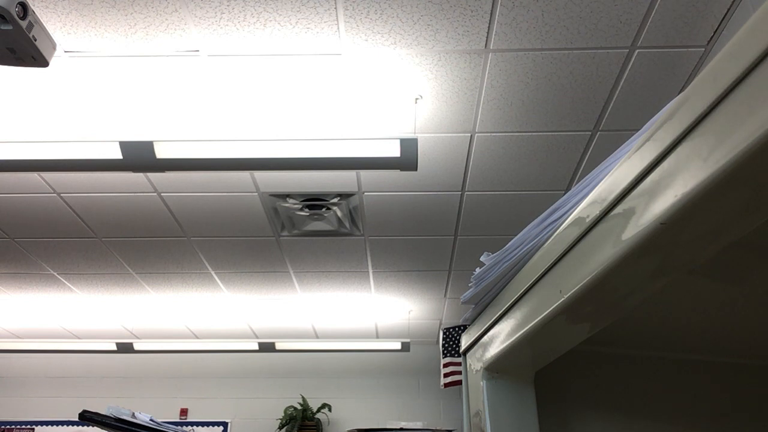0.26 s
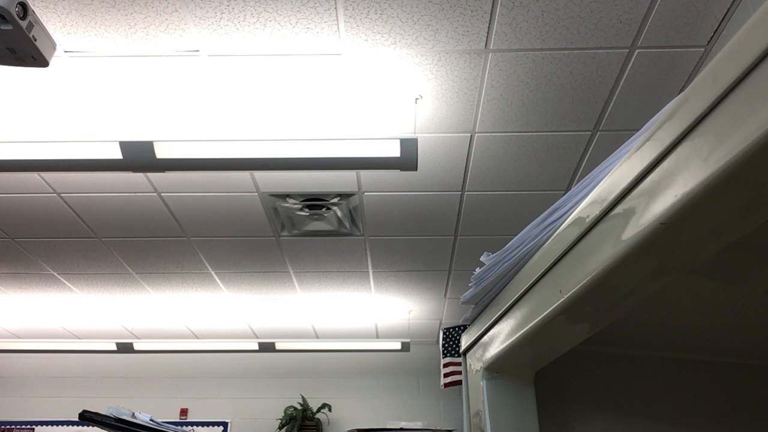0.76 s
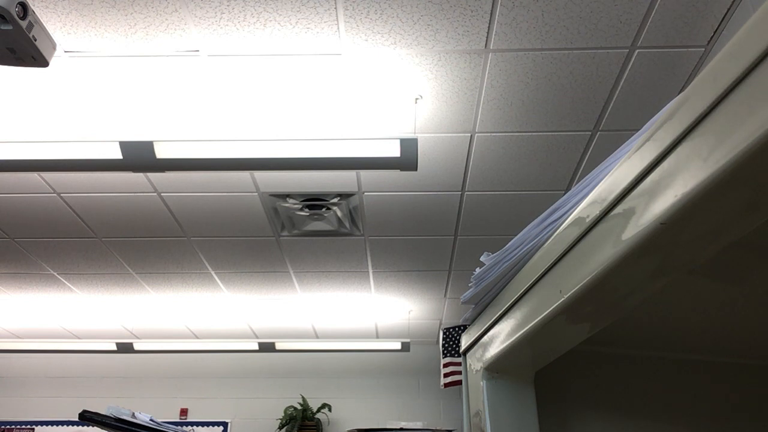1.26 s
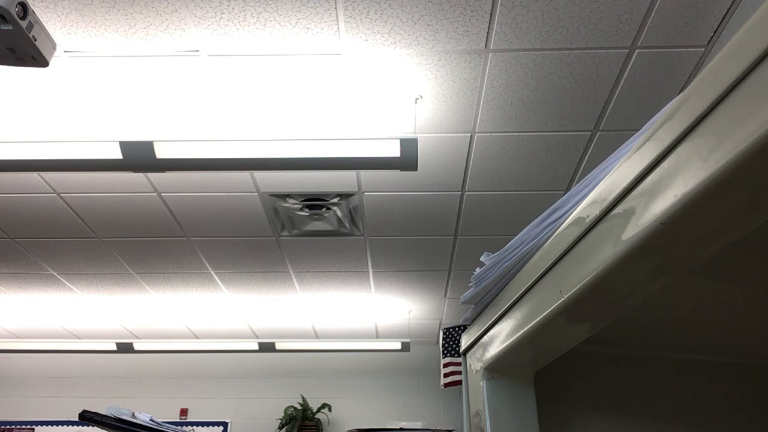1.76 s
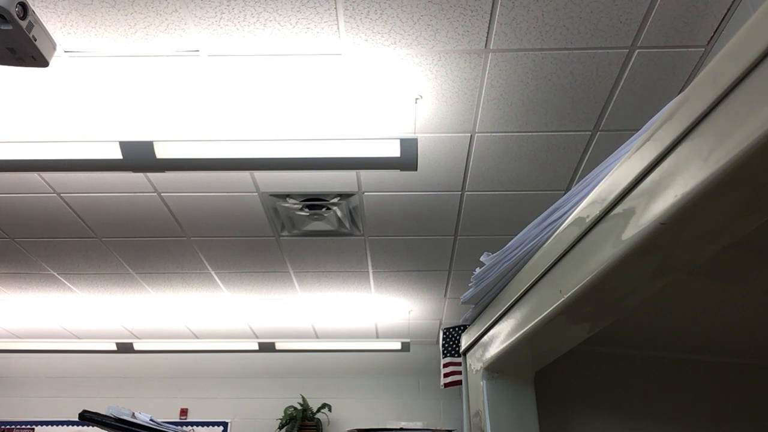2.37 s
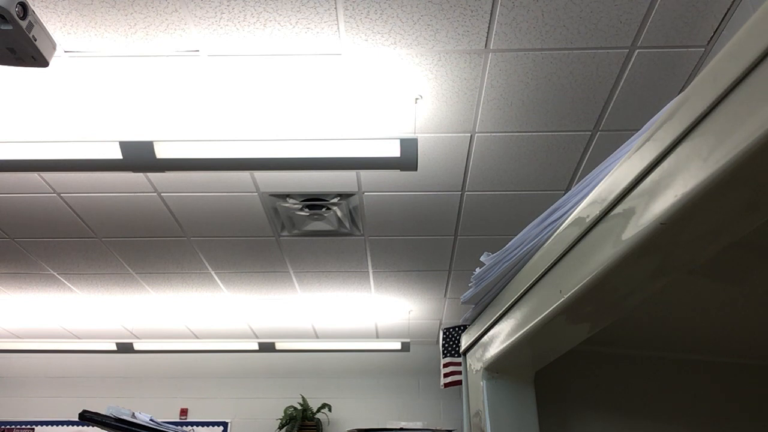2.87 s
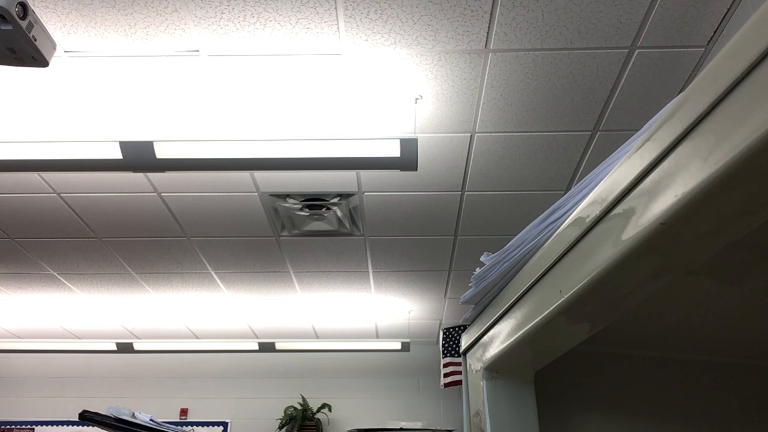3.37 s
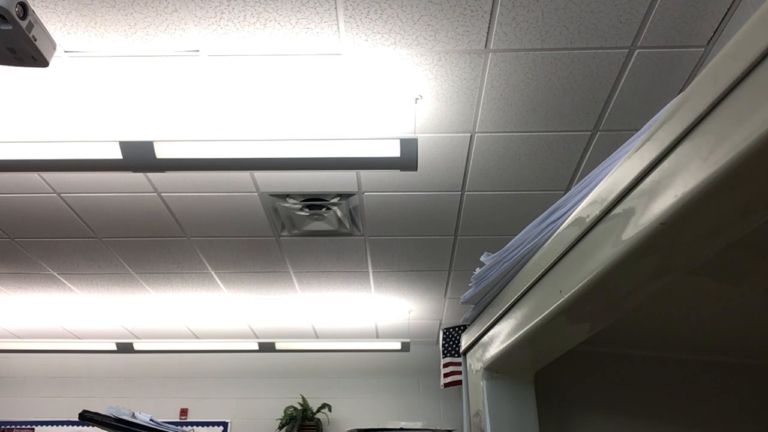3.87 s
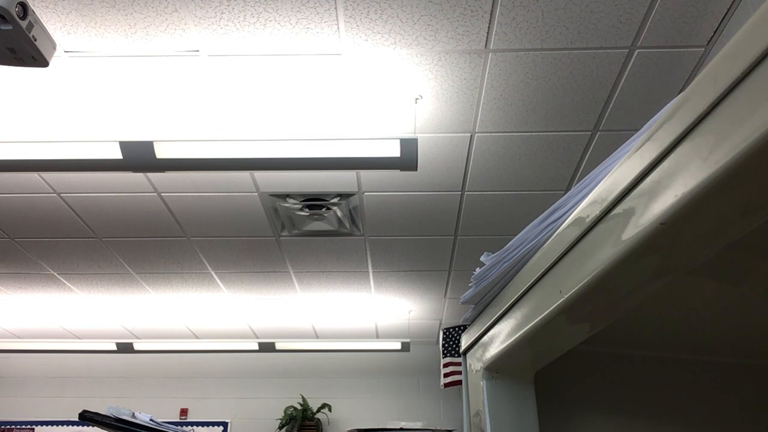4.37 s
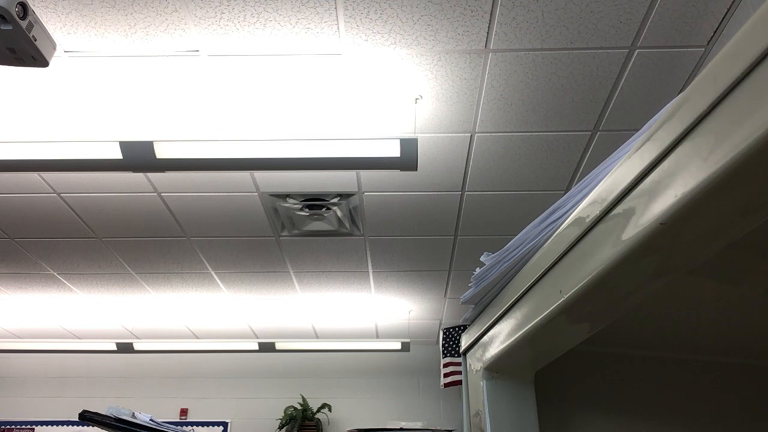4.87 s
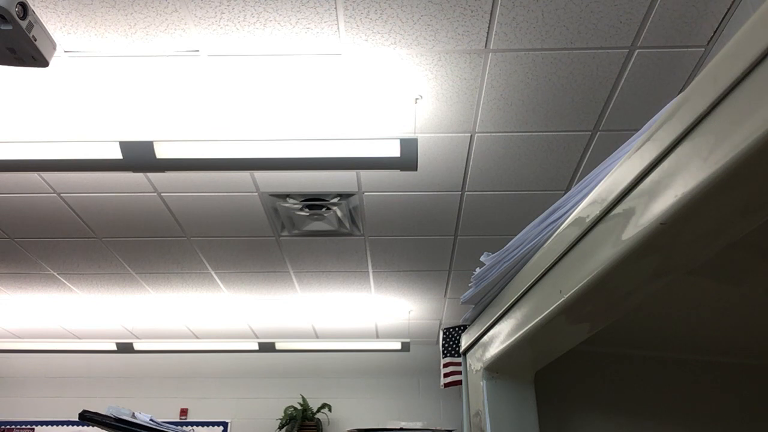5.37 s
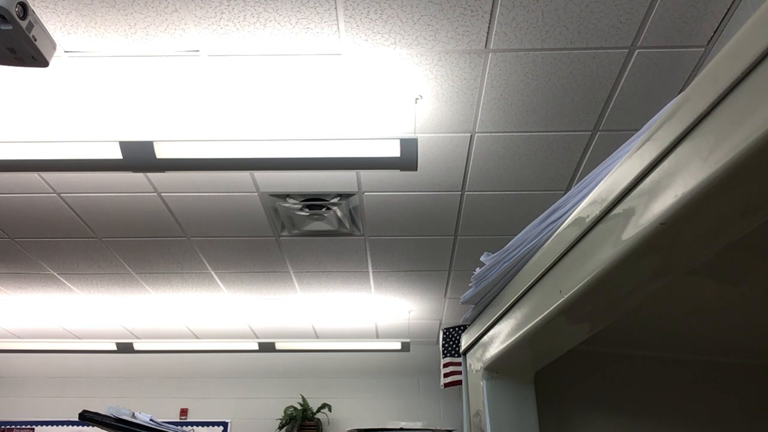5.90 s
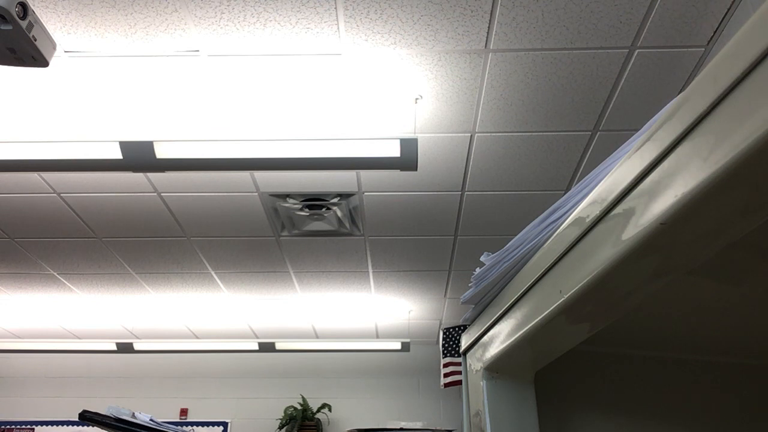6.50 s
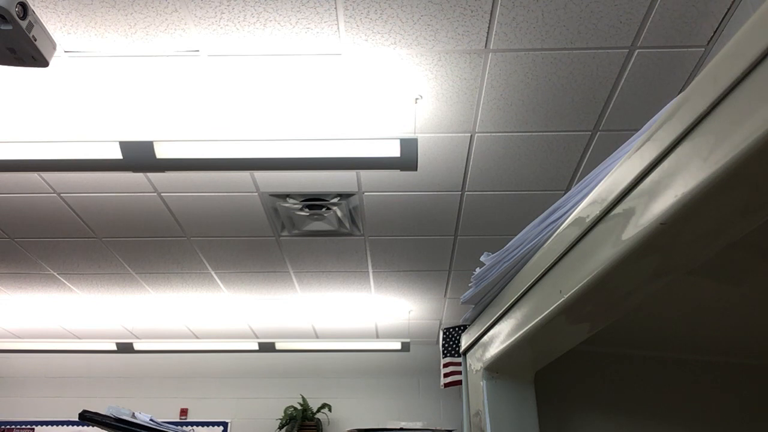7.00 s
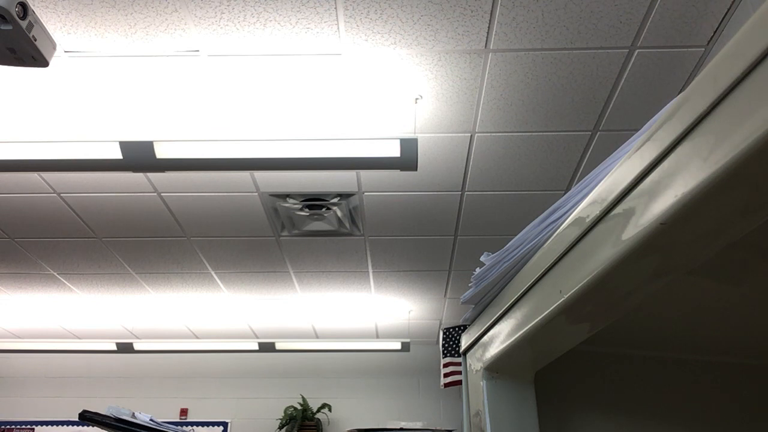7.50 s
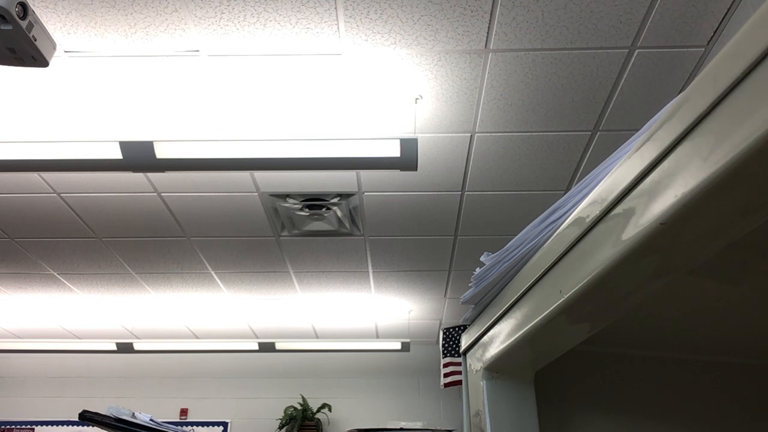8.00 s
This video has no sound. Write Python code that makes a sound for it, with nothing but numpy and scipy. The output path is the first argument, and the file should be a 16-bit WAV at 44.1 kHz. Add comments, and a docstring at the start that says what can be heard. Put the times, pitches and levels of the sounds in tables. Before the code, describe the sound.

Steady low fan and light hum in a still room while papers rustle, little objects are tapped down, something clicks close by, and sheets flick.

```python
"""A quiet classroom. From the start a belt-driven fan throbs under the mains hum of the lights, as steady
partials; noise rumbles in the duct and hisses at the vent. Paper slides in strokes of shaped noise,
small things are tapped and put down as ringing noise bursts, and dull scrapes swell on the floor.
At 1.4 s one sharp click of decaying modes snaps close by; after 5 s sheets are flicked in bright bursts.
The room answers the taps, the click and the flicks briefly with a tail of fading noise."""
import sys
import numpy as np
from scipy import signal
from scipy.fft import rfft, irfft, next_fast_len
from scipy.io import wavfile
from scipy.ndimage import map_coordinates

SR = 44100
rng = np.random.default_rng(int(sys.argv[2]) if len(sys.argv) > 2 else 0)


def transcribe(u):
    """Save the signal u as a 16-bit wav file named by the first command-line argument.

    u: samples, shape (n,) or (channels, n), limited to [-1, 1]; the rate is SR.
    q: integer samples, one column per channel.
    """
    v = np.clip(np.atleast_2d(u).T, -1, 1)
    q = np.round(v * 32767).astype(np.int16)
    wavfile.write(sys.argv[1], SR, q)


N = 363825  # samples: 8.25 s


def amp(db):
    """Decibels to gain."""
    return 10 ** (np.asarray(db) / 20)


def unit(x):
    """Scale to rms 1."""
    return x / np.sqrt(np.mean(x ** 2) + 1e-30)


def along(points, hz):
    """Read (f/Hz, value) points on a log frequency axis."""
    f, value = np.transpose(points)
    return np.interp(np.log(hz + 1), np.log(f + 1), value)


def wobble(rate):
    """A smooth random curve through rate knots a second."""
    knots = rng.standard_normal(int(N * rate / SR) + 4)
    return map_coordinates(knots, [np.arange(N) * rate / SR])


def filtered(x, response):
    """x shaped by a response given as a function of frequency."""
    size = next_fast_len(len(x) + 8192)
    hz = np.fft.rfftfreq(size, 1 / SR)
    return irfft(rfft(x, size) * response(hz), size)[:len(x)]


def noise(response):
    """Noise whose amplitude per root Hz is the response."""
    return filtered(rng.standard_normal(N) * np.sqrt(SR / 2), response)


def resonance(hz, centre, width):
    """Two like resonators in a row: a peak of gain 1 with steep skirts."""
    return (1j * hz * width / (centre ** 2 - hz ** 2 + 1j * hz * width)) ** 2


def add(track, s, sound):
    """Mix a sound in at time s."""
    part = track[max(round(s * SR), 0):][:len(sound)]
    part += sound[:len(part)]


def tones(lines, base_hz, clock):
    """Steady partials (multiple of base_hz, level/dB rms) running on a clock in seconds."""
    out = 0
    for multiple, db in lines:
        cycles = multiple * base_hz * clock + rng.random()
        out = out + amp(db) * np.sin(2 * np.pi * cycles)
    return np.sqrt(2) * out


BELT_HZ, MAINS_HZ = 6.675, 60  # turns of the belt a second; mains frequency
# the fan's throb: (multiple of the belt's turn rate, level/dB rms before it wavers)
BELT_PARTIALS = [(9, -75.5), (10, -66), (11, -55.5), (12, -54.5), (13, -64), (14, -56), (15, -64.5),
                 (16, -61), (17, -64), (19, -50.5), (20, -58.5), (21, -48), (22, -57.5), (23, -56),
                 (24, -69), (25, -55), (26, -73.5), (28, -70), (29, -65), (31, -68.5), (32, -80)]
# lights and motor windings: (multiple of the mains frequency, level/dB rms)
MAINS_PARTIALS = [(2, -42.5), (4, -65), (6, -72.5)]
# other shafts of the air plant: (f/Hz, level/dB rms)
SHAFT_TONES = [(58.3, -73.5), (86.3, -58), (100.9, -59.5), (148.1, -58), (154.7, -60.5)]


def hum():
    """Each turn of the belt shakes the duct alike, so its partials beat with the mains hum."""
    t = np.arange(N) / SR
    slip = 0.00036 * wobble(1.495)  # seconds: the belt runs a little unevenly
    lights = tones(MAINS_PARTIALS, MAINS_HZ, t)
    out = lights + tones(SHAFT_TONES, 1, t + slip)
    for partial in BELT_PARTIALS:
        eddies = amp(0.55 * wobble(2.91))  # eddies make each partial waver on its own
        out += eddies * tones([partial], BELT_HZ, t + slip)
    return out


# duct rumble: (f/Hz, level/dB per Hz)
DUCT_RUMBLE = [(20, -108), (36, -104), (48, -90), (72, -68), (95, -80), (112, -75.5), (150, -67),
               (185, -83.5), (212, -79.5), (260, -87.5), (370, -92.5), (520, -100), (900, -112),
               (2000, -135)]
# air leaving the vent: (f/Hz, level/dB per Hz)
VENT_HISS = [(200, -120), (650, -101), (1000, -108), (1800, -110.5), (3000, -111.5), (5000, -115),
             (7000, -115), (8200, -118), (11000, -120.5), (15500, -127)]
# duct resonances: (f/Hz, width of each resonator/Hz, peak level/dB per Hz)
DUCT_RESONANCES = [(451, 8.4, -89), (372, 14.5, -89.5)]


def air():
    """Turbulence rumbles and resonates in the duct and hisses at the vent."""
    rumble = noise(lambda hz: amp(along(DUCT_RUMBLE, hz)))
    hollow = noise(lambda hz: sum(amp(db) * resonance(hz, centre, width)
                                  for centre, width, db in DUCT_RESONANCES))
    hiss = noise(lambda hz: amp(along(VENT_HISS, hz)))
    return rumble + hollow + hiss


def nearby_surfaces(x):
    """Weak early copies from desk and shelves ripple the spectrum."""
    count, echo = 8, 0.17  # copies, gain of each relative to the direct sound
    delays = rng.uniform(0.002, 0.02, count)  # seconds

    def ripple(hz):
        return 1 + echo * sum(np.exp(-2j * np.pi * hz * d) for d in delays)
    return filtered(x, ripple) / np.sqrt(1 + count * echo ** 2)


# strokes of sliding paper: (start t/s, length t/s, rub level/dB, edge hiss level/dB)
PAPER_STROKES = [(0.21, 0.2, -74.5, -75), (0.4, 0.12, -72, -68.5), (1.21, 0.26, -77, -68),
                 (1.48, .62, -66, -68), (2.152, .11, -67, -68.5), (2.277, 0.29, -75, -78),
                 (2.873, .09, -83, -71), (3.042, 0.059, -85, -70.5), (3.797, 0.24, -67, -70.5),
                 (4.155, 0.22, -68.5, -74.5), (4.548, 0.39, -74, -72), (5.398, 0.32, -72, -70.5),
                 (5.744, 0.24, -77.5, -75), (5.97, .16, -70, -72.5), (6.407, 0.27, -74, -75.5),
                 (7.437, 0.3, -89, -73), (7.826, 0.26, -98, -72), (8.111, 0.15, -76, -66.5)]
# relative spectrum of the rubbing face of the sheet: (f/Hz, level/dB)
RUB_COLOUR = [(300, -5.5), (700, -4), (1300, 6.5), (2200, 4), (3000, 4), (4200, 2.5), (5200, -1),
              (7000, -26), (12000, -22)]
# relative spectrum of the hissing edge of the sheet: (f/Hz, level/dB)
EDGE_COLOUR = [(2500, -11), (4500, -1), (5800, -1.5), (7000, 3), (8000, -4.5), (10000, -8.5),
               (15500, -21.5)]
# where the paper rings thinly: (peak t/s, level/dB)
PAPER_RINGS = [(3.74, -70), (4.63, -76.5)]
STROKE_ATTACK_S, STROKE_RELEASE_S = 0.046, 0.051
DRIFT_RUB_DB, DRIFT_EDGE_DB = -80, -80.5  # the sheet never lies quite still
RING_HZ, RING_RISE_DB_PER_S, RING_FALL_DB_PER_S = 4080, 95, 25


def paper():
    """Paper slides in uneven strokes, catching and letting go; twice it rings thinly."""
    t = np.arange(N) / SR
    rub_power, edge_power = amp(DRIFT_RUB_DB) ** 2, amp(DRIFT_EDGE_DB) ** 2
    for s, length, rub_db, edge_db in PAPER_STROKES:
        attack = np.clip((t - s) / STROKE_ATTACK_S, 0, 1)
        release = np.exp(-np.maximum(t - s - length, 0) / STROKE_RELEASE_S)
        speed = attack * release
        rub_power = rub_power + (amp(rub_db) * speed) ** 2
        edge_power = edge_power + (amp(edge_db) * speed) ** 2
    catch = amp(1.1 * wobble(45))
    rub = unit(noise(lambda hz: amp(along(RUB_COLOUR, hz)))) * np.sqrt(rub_power)
    edge = unit(noise(lambda hz: amp(along(EDGE_COLOUR, hz)))) * np.sqrt(edge_power)
    swell = 0
    for s, db in PAPER_RINGS:
        drop_db = np.maximum((s - t) * RING_RISE_DB_PER_S, (t - s) * RING_FALL_DB_PER_S)
        swell = swell + amp(db - drop_db)
    flutter = amp(4.7 * wobble(30))
    ring = unit(noise(lambda hz: resonance(hz, RING_HZ, 550))) * swell * flutter
    return nearby_surfaces(catch * (rub + edge) + ring)


# reverberation: (f/Hz, decay by 60 dB t/s)
ROOM_DECAY = [(300, 0.32), (1500, 0.33), (4000, 0.31), (8000, 0.31), (15000, 0.05)]


def room_tail():
    """A fresh diffuse tail of energy 1; the extreme treble dies first."""
    hz, t, grains = signal.stft(rng.standard_normal(SR // 2), SR, nperseg=256)
    fade = amp(-60 * t / along(ROOM_DECAY, hz)[:, None])
    tail = signal.istft(grains * fade, SR, nperseg=256)[1][:SR // 2]
    return tail / np.linalg.norm(tail)


def touch(contact, room_db):
    """A brief cluster of contacts lasting about contact seconds, followed by the room's answer."""
    t = np.arange(SR // 2) / SR
    rise = 1 - np.exp(-t / (0.12 * contact))
    chatter = unit(amp(2.5 * map_coordinates(rng.standard_normal(400), [t * 700])))  # 700 knots a second
    early = chatter * rng.standard_normal(len(t)) * amp(-8 * t / (contact + 0.009))
    late = amp(room_db) * room_tail() * (1 - np.exp(-t / contact))
    return rise * (early + late)


# how far a bass adjustment reaches: (f/Hz, share from 0 to 1)
BASS_REACH = [(600, 1), (1400, .6), (2800, 0)]
# how far a treble adjustment reaches: (f/Hz, share from 0 to 1)
TREBLE_REACH = [(2800, 0), (6000, 1)]


def touch_colour(hz, colour, bass_db, treble_db):
    """Gain of a touch: a common colour with its own bass and treble tilt."""
    return amp(along(colour, hz) + bass_db * along(BASS_REACH, hz) + treble_db * along(TREBLE_REACH, hz))


# hard things tapped and put down:
# (t/s, level/dB, bass level/dB, treble level/dB, contact t/s, ring f/Hz, ring level/dB)
TAP_EVENTS = [(.497, -48, 7.5, -22, 0.028, 2160, -4), (.691, -47.5, 0, -15, .009, 1230, -8),
              (.789, -56, 8, -1, 0.0067, 3220, -8), (1.175, -57, -6, 3, 0.026, 1960, -12),
              (1.464, -47, 1.5, 1.5, 0.021, 2780, -7), (3.561, -58, -8, 0, .0072, 3040, -4),
              (4.451, -51, 5, 8.5, 0.0081, 2250, -2), (4.486, -53.5, 15.5, -3, 0.021, 1510, 0.5),
              (4.652, -52.5, 0, 4, 0.011, 1660, -3), (4.761, -42.5, 5.5, 0, 0.0034, 2160, -1),
              (4.767, -37.8, -3, -4, 0.0073, 3150, 0), (5.314, -50.5, -3, 2, 0.0088, 2060, 9),
              (5.486, -39, -10, -2, 0.0055, 3060, -3), (5.498, -40, -1, 6.5, 0.0077, 3500, -7),
              (6.305, -63.5, 13, 10, 0.015, 1580, -3)]
# colour common to all taps: (f/Hz, level/dB)
TAP_SPECTRUM = [(150, -33), (600, -5.5), (1400, -1.5), (2800, 1), (6000, -10), (7000, -15), (8200, -19),
                (11000, -25.5), (16000, -49)]


def taps():
    """Each tap rings the object's main mode and a weaker one near its octave."""
    out = np.zeros(N)
    for s, db, bass_db, treble_db, contact, ring_hz, ring_db in TAP_EVENTS:
        def body(hz):
            main = resonance(hz, ring_hz, 590)
            octave = 0.65 * resonance(hz, 2.01 * ring_hz, 650)
            modes = 1 + amp(ring_db) * (main + octave)
            return touch_colour(hz, TAP_SPECTRUM, bass_db, treble_db) * modes
        burst = touch(max(contact, 0.002), room_db=21.5)
        add(out, s, amp(db) * filtered(burst, body))
    return out


# dull scrapes on the floor:
# (peak t/s, t/s from peak to 1/e^2, pitch f/Hz, width of each resonator/Hz, peak level/dB rms)
FLOOR_SCRAPES = [(0.533, 0.056, 520, 150, -64.5), (1.735, 0.14, 460, 25, -64), (1.75, 0.3, 370, 202, -63.5),
                 (1.737, 0.11, 750, 140, -72), (1.848, 0.038, 540, 131, -63.5),
                 (7.617, 0.041, 430, 150, -65), (7.657, 0.13, 323, 70, -62.5)]


def scrapes():
    """Something heavy shifts: each short rub swells in one low resonance."""
    t, out = np.arange(N) / SR, np.zeros(N)
    for s, length, pitch_hz, width, db in FLOOR_SCRAPES:
        swell = np.exp(-2 * ((t - s) / length) ** 2)
        rub = unit(noise(lambda hz: resonance(hz, pitch_hz, width)))
        out += amp(db) * swell * rub
    return out


# the close plastic click: (t/s, level/dB before the ring and echo take their own gains)
CLICK_EVENT = (1.3872, -28.5)
# modes of the plastic part: (f/Hz, relative level/dB before the band-pass, decay by 60 dB t/s)
PLASTIC_MODES = [(1300, -27, 0.014), (2600, -23, 0.017), (3610, -3.5, 0.018), (4460, -0.5, 0.011),
                 (5430, -16, 0.0038), (6200, 9, 0.0034), (6980, -5, 0.013), (7400, -29, 0.0086)]
# colour of the walls' answer to the click: (f/Hz, level/dB)
ECHO_COLOUR = [(400, -30), (800, -16), (1200, 1), (1800, -8), (2700, 5), (4400, 2), (7000, -1), (8500, -9),
               (15000, -37)]


def click():
    """A small plastic part snaps close by: a faint slip, a ring of a few milliseconds, a weak echo."""
    out, t = np.zeros(N), np.arange(SR // 2) / SR
    s, db = CLICK_EVENT
    ring = sum(amp(level - 60 * t / t60) * np.sin(2 * np.pi * hz * t) for hz, level, t60 in PLASTIC_MODES)
    low_hz, soft_hz = 950, 8400  # too small to radiate bass; the contact time dulls the very top
    band = signal.butter(4, [low_hz, soft_hz], "bandpass", fs=SR, output="sos")
    ring = signal.sosfilt(band, ring)
    ring *= 1.6 / np.abs(ring).max()
    add(out, s - 0.0033, amp(db - 14) * ring)  # the slip
    add(out, s, amp(db) * ring)
    near_walls = 1 + 0.88 * np.exp(-t / 0.011)  # the first reflections are the strongest
    echo = filtered(room_tail() * near_walls, lambda hz: amp(along(ECHO_COLOUR, hz)))
    add(out, s + 0.0043, amp(db + 7.5) * echo)
    return out


# crisp flicks of a sheet: (t/s, level/dB, treble level/dB)
FLICK_EVENTS = [(5.111, -56, 2), (6.44, -64, 9), (6.6, -57.5, 2), (6.925, -48, 3), (6.966, -52.5, -6),
                (7.137, -51, -3), (7.164, -48.5, -5), (7.214, -61, -13), (7.393, -56, 2.5)]
# colour common to all flicks: (f/Hz, level/dB)
FLICK_SPECTRUM = [(150, -38), (600, -17), (1400, 2), (2000, -0.5), (2800, 0), (6000, -5), (7000, -10),
                  (8200, -10), (11000, -15), (16000, -31)]
FLICK_CONTACT_S = 0.026


def flicks():
    """A flicked sheet gives a soft, bright burst without a ring."""
    out = np.zeros(N)
    for s, db, treble_db in FLICK_EVENTS:
        burst = touch(FLICK_CONTACT_S, room_db=25)
        sheet = filtered(burst, lambda hz: touch_colour(hz, FLICK_SPECTRUM, 0, treble_db))
        add(out, s, amp(db) * sheet)
    return out


def scene():
    """Everything at one microphone."""
    return (hum() + air() + paper() + taps() + scrapes() + click() + flicks())[None]


TOP_HZ = 15720  # upper band limit


def record(dry):
    """The recorder keeps nothing above its band limit."""
    return np.array([filtered(channel, lambda hz: hz < TOP_HZ) for channel in dry])


dry = scene()
out = record(dry)
transcribe(out)
```